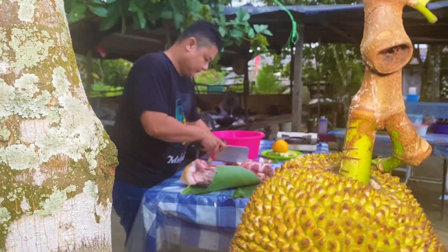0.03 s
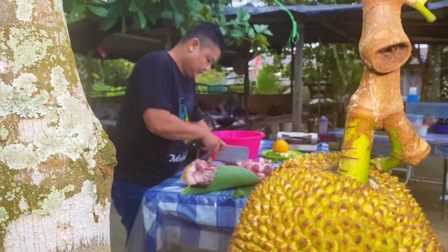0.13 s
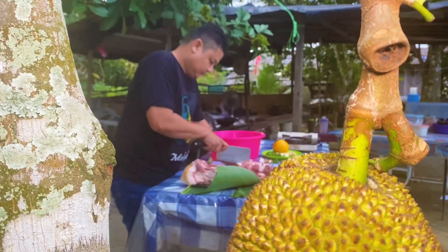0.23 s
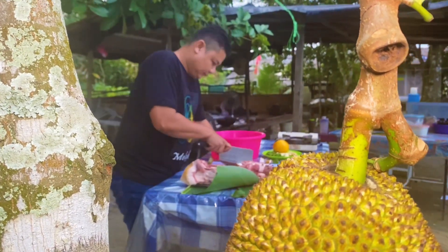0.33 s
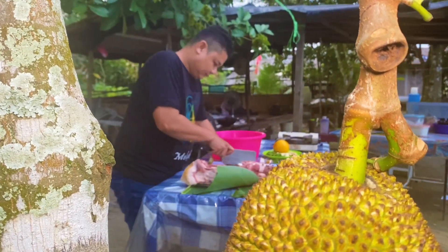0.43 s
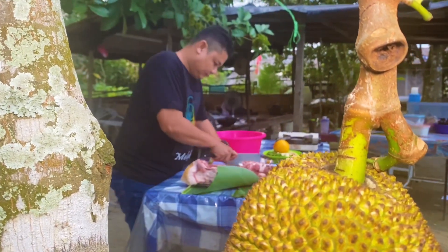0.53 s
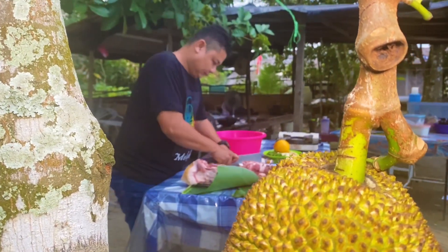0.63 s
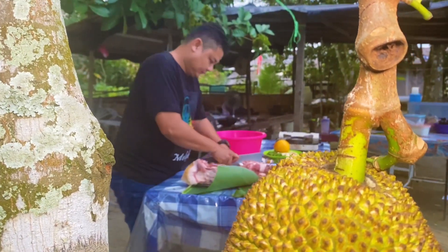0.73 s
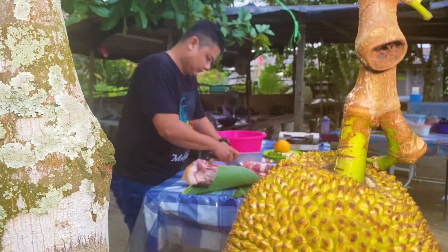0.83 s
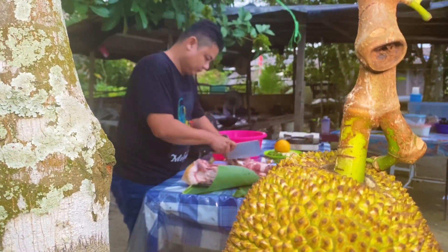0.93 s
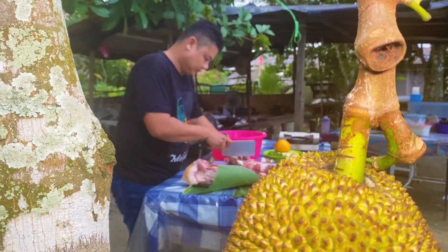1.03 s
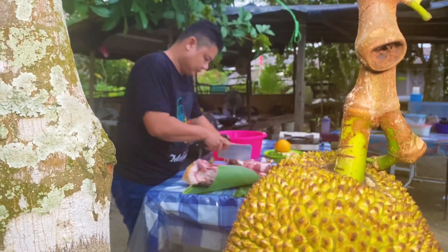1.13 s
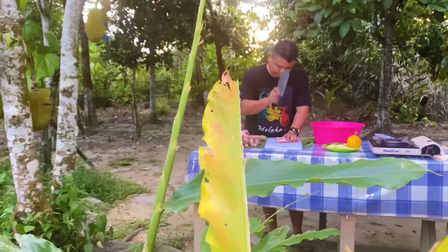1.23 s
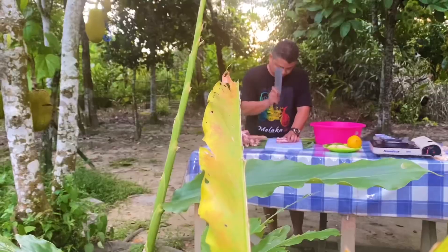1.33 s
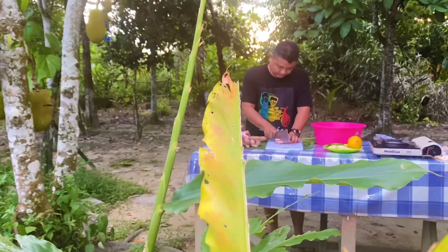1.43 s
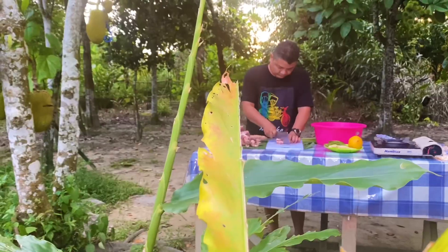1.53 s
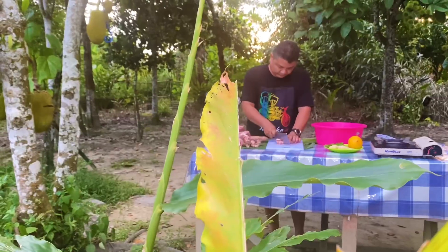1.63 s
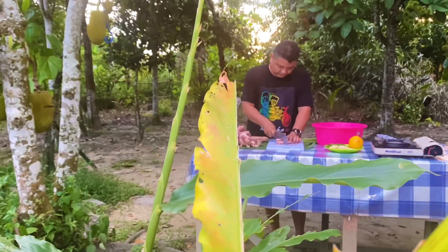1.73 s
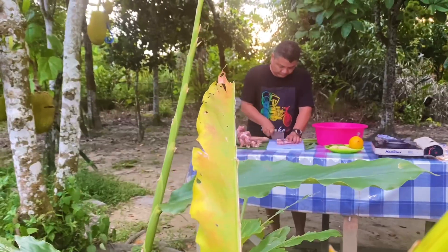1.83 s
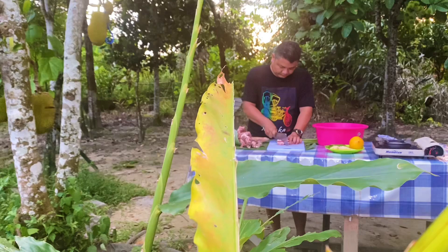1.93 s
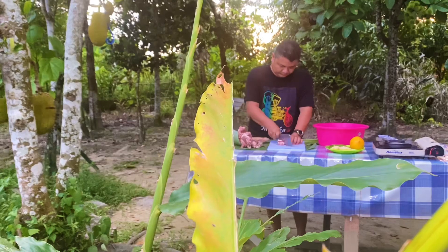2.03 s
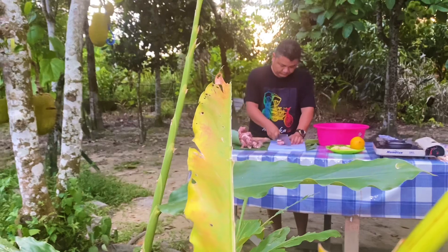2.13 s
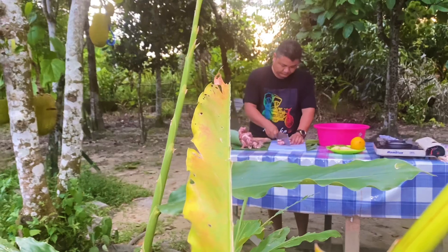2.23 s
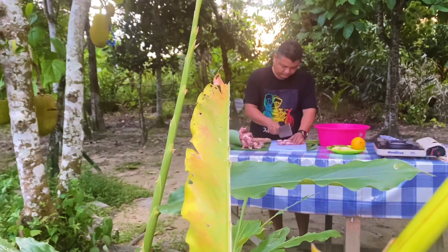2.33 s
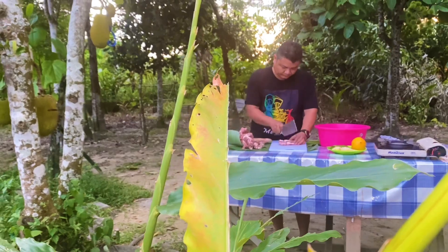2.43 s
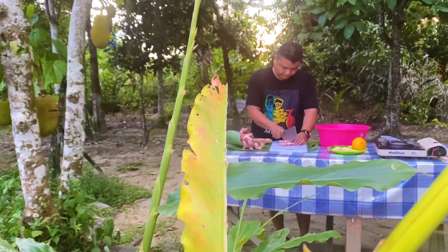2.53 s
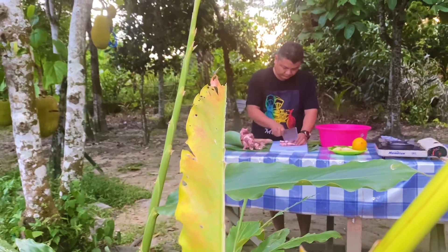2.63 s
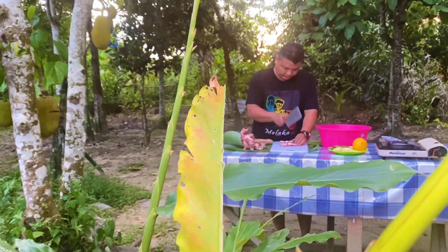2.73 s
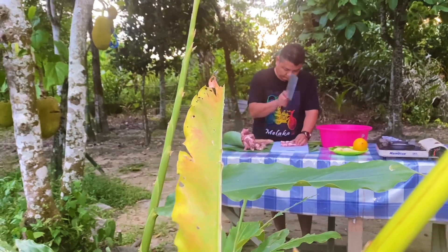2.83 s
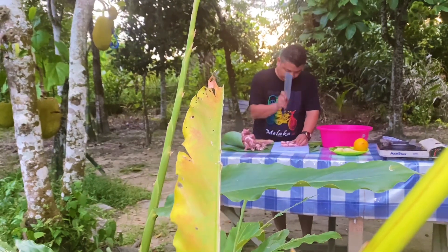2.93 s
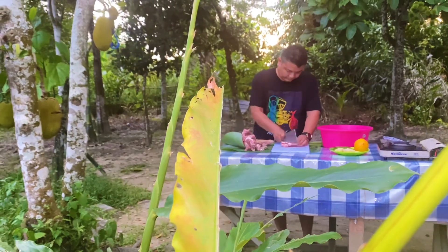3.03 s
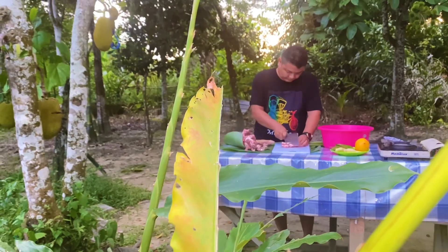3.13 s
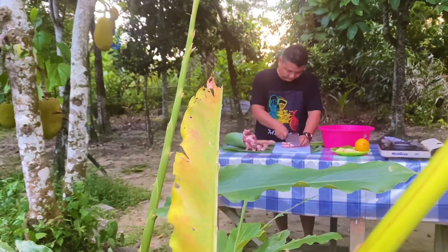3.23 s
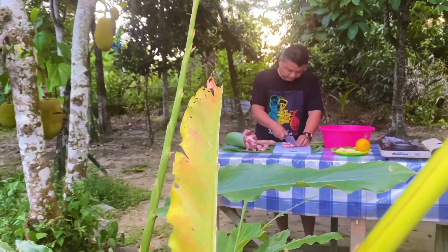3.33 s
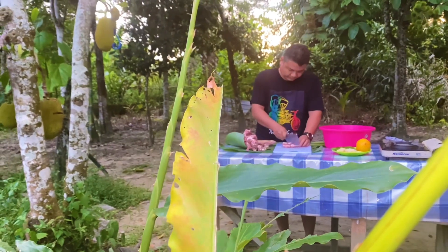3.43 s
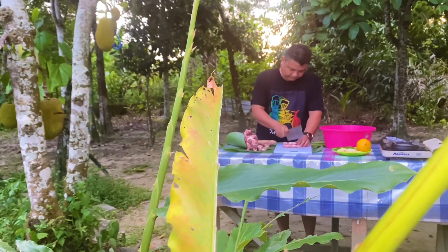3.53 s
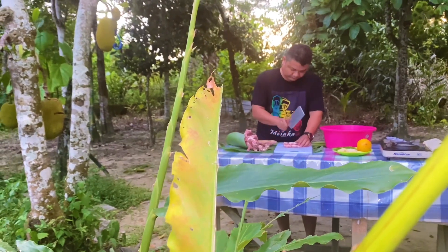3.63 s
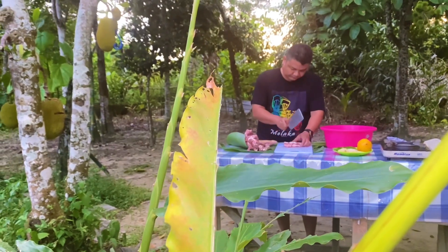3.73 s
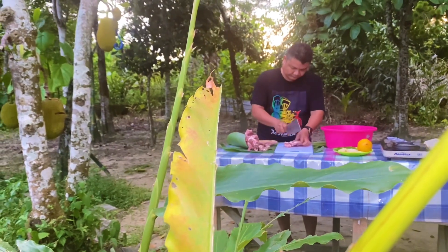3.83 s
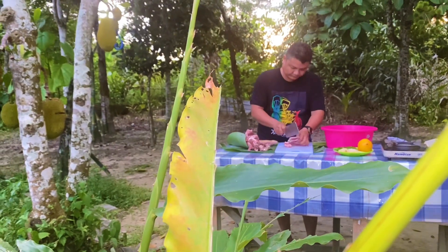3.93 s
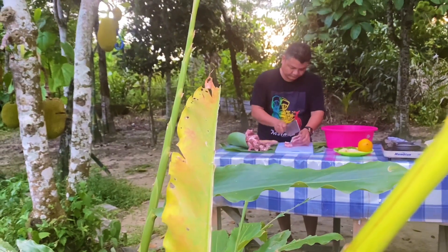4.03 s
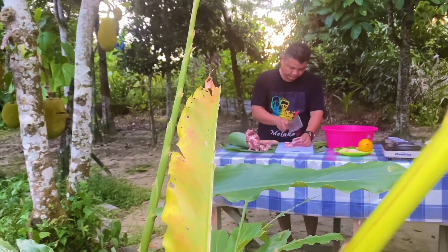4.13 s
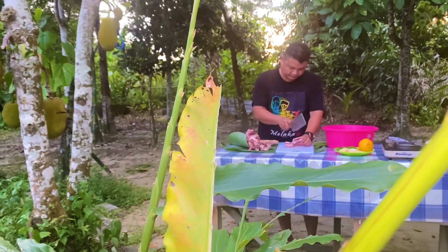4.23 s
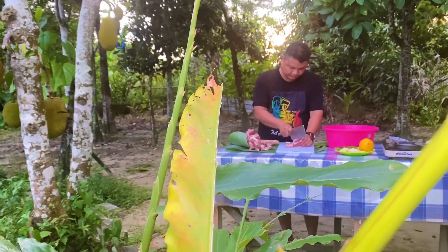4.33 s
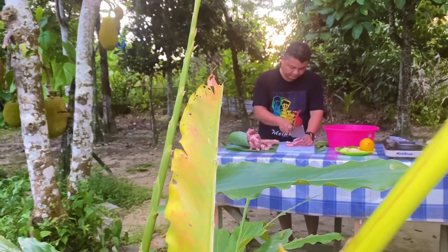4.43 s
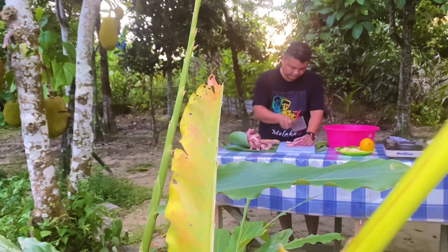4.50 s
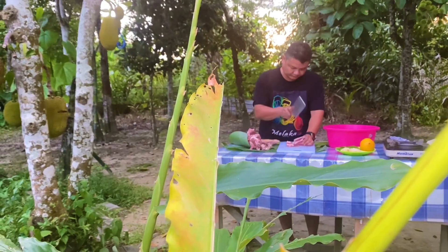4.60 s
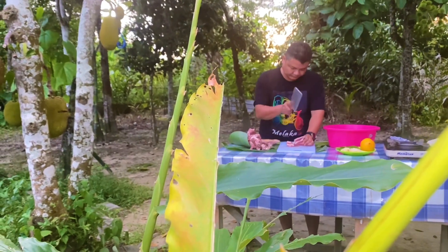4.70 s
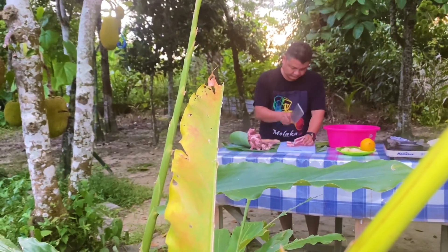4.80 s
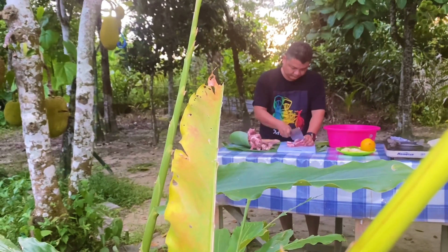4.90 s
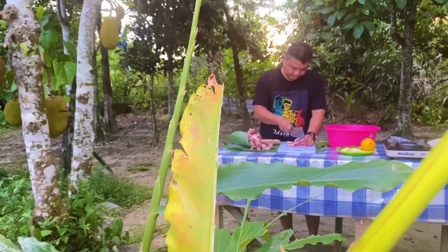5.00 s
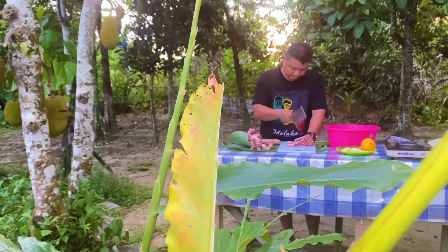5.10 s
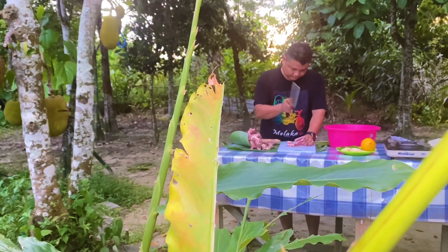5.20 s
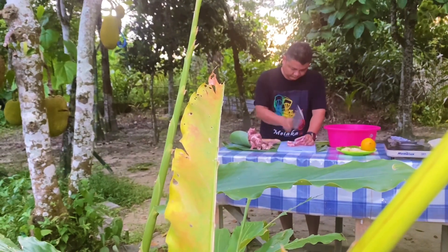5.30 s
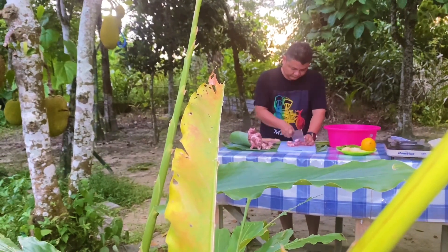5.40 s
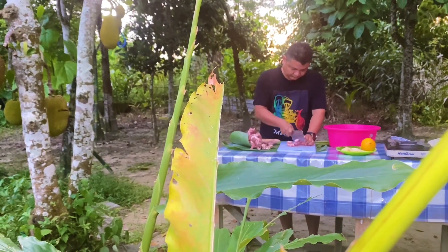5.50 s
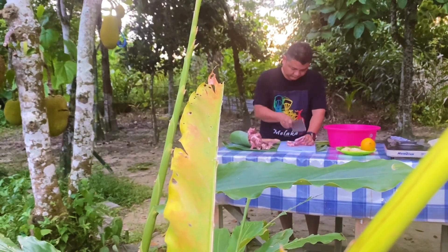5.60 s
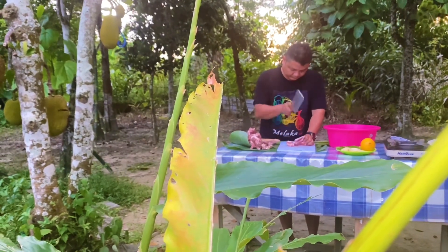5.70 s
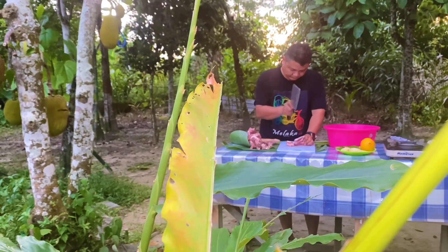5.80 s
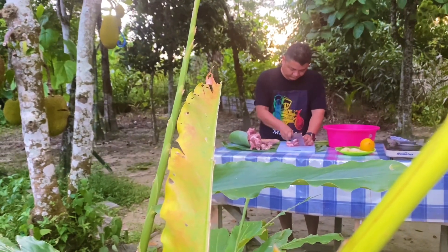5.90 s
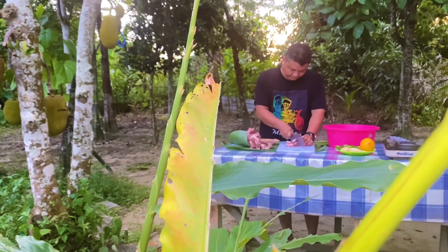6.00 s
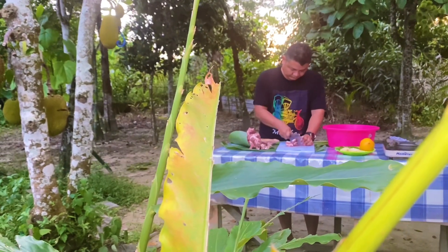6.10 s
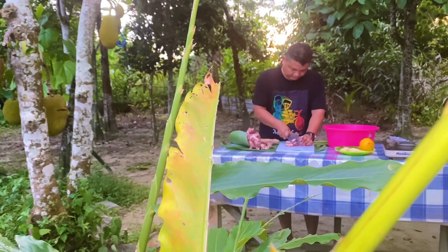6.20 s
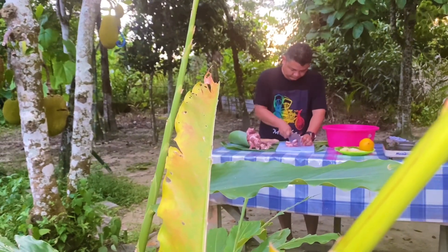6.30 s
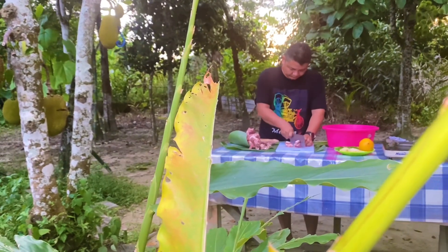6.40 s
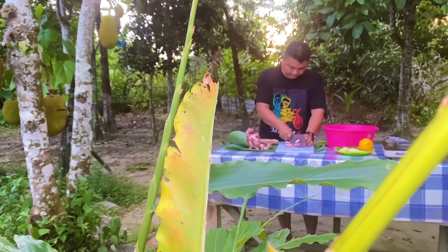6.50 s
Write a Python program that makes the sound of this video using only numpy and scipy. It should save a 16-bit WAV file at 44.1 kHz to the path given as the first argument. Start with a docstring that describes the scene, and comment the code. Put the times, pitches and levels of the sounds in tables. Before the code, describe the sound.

In a garden, heard from a few metres away, a cleaver chops meat and bone on a wooden board. Two hard, crunching chops come well apart, then a faint one and two moderate ones closer together, with light blade taps between. The stronger blows knock the board and rattle loose dishes on the table. Distant motors hum low while insects sing and birds call faintly. Everything briefly drops out just before the first chop.

```python
"""A garden, a few metres from a table where a cleaver chops meat and bone on a wooden board.
Each chop crunches, knocks the board and makes it hop; a tenth of a second later loose ware rattles down.
Behind it two far motors hum, insects sing, birds call and leaves hiss.
The level dips briefly to near silence just after the first second."""
import sys
import numpy as np
from scipy import signal
from scipy.fft import rfft, irfft, next_fast_len
from scipy.io import wavfile
from scipy.ndimage import uniform_filter1d

SR = 44100
rng = np.random.default_rng(int(sys.argv[2]) if len(sys.argv) > 2 else 0)


def master_out(mix):
    """Clip the mix to full scale and print it as 16-bit PCM to the path in sys.argv[1]."""
    frames = np.transpose(np.atleast_2d(mix))
    ceiling = np.clip(frames, -1, 1)
    pcm = np.round(ceiling * 32767).astype(np.int16)
    wavfile.write(sys.argv[1], SR, pcm)


N = 288936
T = np.arange(N) / SR
FFT_SIZE = next_fast_len(N, True)

# start_s, sink_s, snap_fraction, crunch_db, blade_db, snap_db, seat_db, thud_db, thud_hz, hop_s,
# landing_db, rebound_db, tilt_db_per_octave, landing_tilt_db_per_octave, edge_db
CHOPS = [(1.4566, 0.0074, 0.42, -10, -32, -2, 0, -1, 225, .0178, -6.5, -7, 1.3, 1.3, -23),
         (3.05, 0.012, 0.41, -9.5, -35, 0, -3, -1, 163, 0.013, -5.5, -5, 1.5, 3, -26),
         (4.913, 0.008, 0.31, -29, -62.5, -16, -30, -14, 233, 0.013, -31, -19, .8, 1.5, -42),
         (5.371, .0115, .23, -21, -30, -22, -21, -9, 138.6, .0175, -14.5, -8, -1, -1.7, -21),
         (5.9203, .0125, .62, -16.5, -23, -13, -15.5, -8, 211, 0.015, -20, -13, -1, -1, -24)]
# freq_hz, density_db
CRUNCH_SPECTRUM = [(150, -11.5), (500, 14), (1800, -3), (3000, -4), (5000, -7), (6500, -13), (8500, -5.5),
                   (10500, -3.5), (12000, -11), (13500, -10), (15000, -22)]
# pitch_hz, level_db, t60_s
BLADE_MODES = [(3370, -9, 0.05), (4190, -20.5, 0.0434), (4920, 0, 0.065), (4850, 11.5, 0.015),
               (6200, -21, 0.0405)]
def cleaver(growth_db=4, sizzle_db=-10, attack_s=.0013, bite_s=.0013):
    """The edge bites, bone splinters in tiny cracks as the blade sinks, the blade rings and sizzles."""
    out, t = np.zeros(N), T[:SR // 4]
    for s, sink_s, snap_fraction, crunch_db, blade_db, *_, edge_db in CHOPS:
        depth = np.minimum(t / sink_s, 1)
        sinking = undb(growth_db * (depth - 1)) * decay(np.maximum(t - sink_s, 0), .017)
        cracks = np.exp(.86 * rng.standard_normal(len(t)))
        splinters = unit(np.repeat(cracks, 16)[:len(t)])
        sizzle = undb(sizzle_db) * depth * decay(t, .29)
        force = (sinking * splinters + sizzle) * np.minimum(t / attack_s + .072, 1)
        add(out, s, undb(crunch_db) * colour(rng.standard_normal(len(t)) * force, CRUNCH_SPECTRUM))
        add(out, s + bite_s, undb(edge_db) * steel(t60_s=.056))
        blade = ring(BLADE_MODES, t, detune=.0025, scatter_db=5.5)
        add(out, s + snap_fraction * sink_s, undb(blade_db) * blade)
    return out


# freq_hz, density_db
STEEL_SPECTRUM = [(500, -22), (3000, -14), (5000, -9.5), (7500, -8), (9200, 2), (10500, 2.5), (12200, -7),
                  (13800, -3), (16000, -9)]
def steel(t60_s):
    """Steel meets something hard: a short, bright snap."""
    return burst(STEEL_SPECTRUM, T[:SR // 12], t60_s)


# pitch_hz, level_db, t60_s
DEEP_BOARD_MODES = [(340, -6, .06), (410, 0, .06), (545, -1, .05), (790, -2, .05)]
def board(second_edge_s=.006, rebound_s=.01035):
    """Bone snaps, the blade seats, the board hops and lands edge by edge, the table springs back."""
    out = np.zeros(N)
    for (s, sink_s, snap_fraction, _, _, snap_db, seat_db, thud_db, thud_hz, hop_s,
         landing_db, rebound_db, tilt, landing_tilt, _) in CHOPS:
        seat_s = s + sink_s
        landing_s = seat_s + hop_s
        add(out, s + snap_fraction * sink_s, knock(snap_db, snap_db - 7, tilt))
        add(out, seat_s, knock(seat_db - 4.5, seat_db, tilt) + undb(thud_db) * thud(thud_hz))
        # only a heavy blow drives the deep modes
        for hit_s, db in ((seat_s, -4), (landing_s, -10)):
            punch = ring(DEEP_BOARD_MODES, T[:SR // 7], detune=.01, scatter_db=1)
            add(out, hit_s, undb(db + 2 * thud_db) * punch)
        for lag_s, db in ((0, landing_db), (second_edge_s, landing_db - 1.5)):
            add(out, landing_s + lag_s, knock(db - 4, db, landing_tilt))
        table_top = thud(hz=105, t60_s=.025)
        frame = undb(-8.5) * thud(hz=64, t60_s=.058)
        add(out, landing_s + rebound_s, undb(rebound_db) * (table_top + frame))
    return out


# pitch_hz, level_db, t60_s
BOARD_MODES = [(330, -6.5, .08), (412.4, -2, 0.12), (467, 0.5, 0.073), (578, 5, 0.082), (666, 2.5, 0.059),
               (735, 3, 0.08), (833, 2.5, 0.085), (946, -2, 0.067), (1010, -7.5, 0.117), (1060, -8.5, 0.11),
               (1190, -10.5, .09), (1310, -6.5, 0.071), (1448, -4, 0.063), (1645, -7.5, 0.1),
               (1918, -9, 0.09), (2073, -10, 0.058), (2202, -10.5, 0.11), (2600, -32, 0.06)]
# freq_hz, density_db
CLATTER_SPECTRUM = [(100, -42), (300, 7.5), (800, 6.2), (1500, 3), (2200, -1), (3200, -10.5), (5000, -14.5),
                    (10000, -23), (15000, -33)]
def knock(ring_db, clatter_db, tilt_db_per_octave=0, pivot_hz=700, tilt_top_hz=2190):
    """The board rings and clatters; harder contact tilts both towards the treble."""
    def tilt_db(hz):
        return tilt_db_per_octave * np.log2(min(hz, tilt_top_hz) / pivot_hz)
    t = T[:SR // 7]
    modes = [(hz, db + tilt_db(hz), t60_s) for hz, db, t60_s in BOARD_MODES]
    clatter = burst([(hz, db + tilt_db(hz)) for hz, db in CLATTER_SPECTRUM], t, t60_s=.055)
    return .37 * undb(ring_db) * ring(modes, t, detune=.0066, scatter_db=1) + undb(clatter_db) * clatter


def thud(hz, t60_s=.041, attack_s=.0017):
    """Part of the table swings for a few cycles."""
    t = T[:SR // 7]
    return 5.05 * np.sin(2 * np.pi * hz * t) * decay(t, t60_s) * (1 - np.exp(-(t / attack_s) ** 2))


# start_s, level_db
BLADE_TAPS = [(.506, -44.5), (.623, -43), (1.947, -38.5), (2.533, -36), (2.559, -39.5), (3.822, -35),
              (4.367, -32), (4.479, -46)]
def taps(attack_s=.0056):
    """The blade touches the board lightly; meat cushions the onset."""
    out = np.zeros(N)
    for s, db in BLADE_TAPS:
        tap = knock(db, db + 5) + undb(db - 11) * thud(hz=207)
        add(out, s, tap * np.minimum(T[:len(tap)] / attack_s, 1))
    return out


# start_s, body_db, tick_db, steel_db
WARE_DROPS = [(1.5769, -16.5, -27, -37), (1.587, -21, -26, -34), (1.6128, -19.5, -22, -16),
              (1.6205, -16.5, -29, -40), (1.626, -21.5, -25, -40), (3.163, -19, -24, -38),
              (3.174, -38, -34, -19.5), (3.1821, -20.5, -28, -36), (3.195, -26, -35, -55),
              (3.2054, -22.5, -43, -55), (3.2215, -26, -40, -55), (3.236, -24, -39, -50),
              (5.4755, -22.5, -37, -52), (5.4808, -17.5, -32, -38), (5.49, -28, -42, -50),
              (5.5124, -29, -46, -60), (6.028, -19.5, -31, -28), (6.035, -25, -40, -55),
              (6.047, -25, -48, -63), (6.071, -29, -44, -58), (6.09, -27, -47, -58)]
# start_s, level_db
SETTLING_KNOCKS = [(1.543, -33), (1.565, -30), (1.581, -30), (3.156, -32), (3.203, -27.5), (5.449, -33),
                   (5.463, -35), (5.987, -41), (6.003, -38), (6.017, -34), (6.078, -37)]
def rattles(bounce_s=.0063):
    """Ware thrown up by a chop drops and bounces once; board and table knock as they settle."""
    out = np.zeros(N)
    for s, body_db, tick_db, steel_db in WARE_DROPS:
        add(out, s, clink(body_db, tick_db) + undb(steel_db) * steel(t60_s=.011))
        flight_s = bounce_s * (1 + .408 * rng.uniform(-.997, 1))
        add(out, s + flight_s, clink(body_db - 9.5, tick_db - 12))
    for s, db in SETTLING_KNOCKS:
        add(out, s, knock(db, db - .5, tilt_db_per_octave=.3))
    return out


# pitch_hz, level_db, t60_s
WARE_MODES = [(1053, -10, 0.082), (1415, -5.5, 0.024), (1620, -2.5, .025), (1960, 2.5, 0.024),
              (2216, 3, 0.014), (2400, -11, 0.013), (2920, -11, 0.0095), (3330, -14, 0.021)]
# freq_hz, density_db
CLACK_SPECTRUM = [(300, -11), (900, -3), (1400, -6), (2000, 1.5), (2600, -6), (3300, -5.5), (4200, -20.5),
                  (8000, -23.5), (15000, -33)]
# freq_hz, density_db
TICK_SPECTRUM = [(400, 3), (2000, 0), (4000, 2.5), (7000, 1), (10500, 6.5), (14000, -6), (16000, -16)]
def clink(body_db, tick_db):
    """Ware hits the table: a tick, a broad clack and a short ring, detuned anew each hit."""
    t = T[:SR // 12]
    tick = burst(TICK_SPECTRUM, t, t60_s=.021)
    clack = burst(CLACK_SPECTRUM, t, t60_s=.035)
    body = undb(-7.5) * ring(WARE_MODES, t, detune=.045, scatter_db=3.5) + undb(-3) * clack
    return undb(body_db) * body + undb(tick_db) * tick


def chatter(count=7, delay_s=.079, length_s=.099, scatter_db=9, threshold_db=-14):
    """Things on the table chatter faintly after a hard chop."""
    out = np.zeros(N)
    for s, _, _, _, _, _, _, thud_db, *_ in CHOPS:
        for k, (jitter, softness) in enumerate(rng.random((count, 2))):
            db = -33 - .6 * thud_db - scatter_db * softness
            hit = clink(db, db - 13)
            if thud_db > threshold_db:
                add(out, s + delay_s + length_s * (k + jitter) / count, hit)
    return out


# time_s, firing_hz
ENGINE_SPEED = [(0, 99.66), (1, 101.2), (1.42, 109.1), (1.69, 94.8), (1.79, 123.6), (2.02, 120.8),
                (2.18, 96), (2.39, 92), (2.52, 125.2), (2.74, 99.9), (2.88, 125.2), (3.03, 122.6),
                (3.28, 103.2), (3.38, 124), (3.8, 133), (4.35, 127), (4.47, 109), (4.72, 104), (4.9, 120.1),
                (5.5, 108), (6.55, 116)]
# through the trees: time_s, level_db
ENGINE_LEVEL = [(0, -48.5), (.8, -51), (1.4, -35.5), (1.68, -38), (1.8, -32.5), (2.0, -37), (2.12, -27),
                (2.33, -36), (2.45, -32.5), (3.03, -28.5), (3.3, -35), (3.8, -32), (4.05, -36.5),
                (4.27, -30), (4.55, -36.5), (4.72, -36), (4.9, -28), (5.1, -45), (6.55, -42.5)]
def engine(cruise_hz=110.3, exhaust_hz=102.5, exhaust_half_width_hz=37, pace_s=.91):
    """A far engine: three harmonics arrive, the exhaust resonates, speed and throttle lift overtones."""
    hz, db = curves(ENGINE_SPEED)[0], curves(ENGINE_LEVEL)[0]
    recent_hz = uniform_filter1d(hz, int(pace_s * SR))
    throttle = undb(.3858 * (hz - recent_hz))
    overtone_db = -3 + .1178 * (hz - cruise_hz)
    exhaust_db = 9 / (1 + ((hz - exhaust_hz) / exhaust_half_width_hz) ** 2)
    phase = 2 * np.pi * np.cumsum(hz * (1 + .016 * walk(45))) / SR
    firing = np.sqrt(2) * np.sin(phase) * (1 + .49 * walk(35)) + undb(-3) * band(87, 51)
    second, third = (np.sqrt(2) * (1 + .49 * walk(50)) * np.sin(k * phase) for k in (2, 3))
    # uneven firings fill the gaps between harmonics
    rumble = undb(-4.5) * (2.73 * band(153, 60) + 1.16 * band(247, 66))
    rasp = undb(-18) * third + undb(-16) * band(401.7, 79)
    overtones = undb(overtone_db) * throttle * (undb(-1) * second + rumble + throttle * rasp)
    return undb(db) * (undb(exhaust_db) * firing + overtones)


# time_s, pitch_hz, level_db
MOTOR_DRONE = [(0, 100.1, -44), (1.05, 101.3, -51), (1.7, 102.6, -30.5), (2.45, 100.3, -29),
               (2.7, 101.7, -34), (3.35, 103, -36), (3.52, 117, -22), (3.7, 112, -37), (4.05, 117.3, -33),
               (4.27, 116, -23), (4.45, 112.3, -28.5), (4.72, 111.3, -33.5), (4.88, 119, -25.5),
               (5.1, 112.1, -46.5), (6.55, 116.3, -46.5)]
def motor(roughness=.33, waver=.0068):
    """A second far motor holds a low, nearly pure note."""
    hz, db = curves(MOTOR_DRONE)
    hum = np.sqrt(2) * tone(hz * (1 + waver * walk(20)))
    return undb(db) * hum * (1 + roughness * walk(24))


# start_s, length_s, start_hz, middle_hz, end_hz, level_db, hoarseness
WHISTLES = [(0, 0.16, 5110, 5170, 5190, -60.5, 0.84), (.565, .03, 3320, 3000, 2750, -61, .2),
            (.738, 0.032, 3200, 2730, 2350, -61, .2), (1.003, .09, 5100, 5100, 5050, -56.5, 0.83),
            (1.035, .055, 2040, 2120, 2060, -55, .5), (1.701, 0.1, 5250, 5220, 5060, -51, 1.2),
            (2.675, .065, 3150, 3060, 3030, -60, .1), (3.858, 0.061, 4600, 5560, 5670, -50, .3),
            (3.906, 0.27, 1665, 1680, 1638, -47, 0.85), (3.94, 0.047, 3900, 3630, 3000, -55, 1.2),
            (4.35, 0.16, 2450, 2260, 2120, -46.5, 0.9), (4.512, 0.034, 4620, 3700, 3170, -56, .3),
            (5.785, .17, 1630, 1610, 1600, -46, 1.1), (5.96, .15, 1650, 1680, 1660, -42.5, 1.1),
            (5.806, 0.068, 5350, 4000, 3250, -50, .15), (5.87, .02, 5600, 5150, 4850, -57, .2),
            (5.9, .018, 5600, 5200, 4860, -53, .2), (6.119, 0.13, 1780, 1737, 1660, -51, 0.8),
            (6.241, 0.27, 1416, 1400, 1367, -51.5, 0.8)]
def whistles():
    """Far birds whistle; fast flutter in pitch and level makes them hoarse."""
    out = np.zeros(N)
    quaver = .055 * walk(800) + .012 * walk(70)
    flutter_db = 2 * walk(80)
    for s, length_s, *pitches_hz, db, hoarseness in WHISTLES:
        hz, swell = note(length_s, *pitches_hz)
        span = int(s * SR) + np.arange(len(hz))
        whistle = tone(hz * (1 + hoarseness * quaver[span]))
        add(out, s, undb(db + hoarseness * flutter_db[span]) * swell * whistle)
    return out


# start_s, length_s, start_hz, middle_hz, end_hz, level_db
NASAL_CALLS = [(.033, 0.048, 429, 455, 452, -53), (.395, .085, 531, 505, 492, -55),
               (.88, .055, 400, 392, 382, -58), (2.115, 0.16, 338, 388, 355, -47)]
# freq_hz, gain_db
THROAT_RESPONSE = [(900, -29), (1400, -4), (1900, 1), (2350, -13.5), (2900, -25), (3500, -6), (3900, -7),
                   (4500, -30)]
def nasal_calls():
    """A bird's nasal cries: harmonics 3 to 11, shaped by its throat."""
    out = np.zeros(N)
    waver = .0058 * walk(200)
    for s, length_s, *pitches_hz, db in NASAL_CALLS:
        hz, swell = note(length_s, *pitches_hz)
        hz = hz * (1 + waver[int(s * SR):][:len(hz)])
        cry = sum(undb(np.interp(k * hz, *np.transpose(THROAT_RESPONSE))) * tone(k * hz)
                  for k in range(3, 12))
        add(out, s, undb(db) * swell * cry)
    return out


# start_s
PEEP_TIMES = [2.295, 2.452, 2.59, 2.705, 2.897, 3.375, 3.525, 3.74, 4.245, 4.64, 4.745, 5.105, 5.29, 5.668,
              5.845, 6.228]
def peeps(pitch_hz=2200, length_s=.031):
    """A small creature peeps repeatedly on nearly one note."""
    out = np.zeros(N)
    hz, swell = note(length_s, pitch_hz, pitch_hz, pitch_hz)
    for s in PEEP_TIMES:
        detune, strength = rng.standard_normal(2)
        add(out, s, undb(-56.5 + 1.1 * strength) * swell * tone(hz * (1 + .009 * detune)))
    return out


# start_s, level_db
INSECT_RASPS = [(1.501, -53), (2.5, -52), (4.01, -51), (4.94, -50.5), (5.97, -51)]
def insect(length_s=.49, release_s=.012, pulse_hz=99):
    """One nearer insect rasps in rapid pulses that swell, then stop."""
    corners_s = [0, length_s / 2, length_s - release_s, length_s]
    swell = sum(undb(db) * np.interp(T - s, corners_s, [.038, 1, 1, .059]) for s, db in INSECT_RASPS)
    cycle = np.cumsum(pulse_hz * (1 + .006 * walk(8))) / SR % 1
    pulses = unit(np.sin(np.pi * cycle) * np.exp(-2.5 * cycle))
    return swell * pulses * band(hz=9330, width_hz=450)


# centre_hz, width_hz, start_db, end_db
SONG_AND_HISS_BANDS = [(4690, 320, -59, -52.5), (5060, 400, -63.5, -61.5), (6860, 630, -58.5, -58),
                       (7865, 710, -61, -55)]
def song_and_hiss():
    """Steady narrow bands of insect song, plus a band of background hiss near 8 kHz."""
    out = np.zeros((2, N))
    for hz, width_hz, start_db, end_db in SONG_AND_HISS_BANDS:
        pair = np.array([band(hz, width_hz), band(hz, width_hz)])
        db = start_db + (end_db - start_db) * T / T[-1]
        out += pair * undb(db + .302 * walk(4.7) + .29 * walk(40))
    return out


# freq_hz, density_db
AIR_SPECTRUM = [(25, -21.5), (45, -7), (65, -5), (100, 0), (170, -4), (240, -4), (330, -22), (550, -26),
                (800, -22.5), (1200, -29), (2000, -30), (3400, -37), (6000, -38.5), (8000, -54),
                (9500, -30.5), (12000, -49.5), (15000, -41.5)]
# time_s, level_db
AIR_LEVEL = [(0, -39), (1, -40.5), (1.4, -33), (3, -33), (4.5, -34.5), (5.5, -35.5), (6.55, -32)]
def air():
    """Distant rumble and the faint hiss of leaves."""
    return unit(diffuse(AIR_SPECTRUM, FFT_SIZE)[:, :N]) * undb(curves(AIR_LEVEL)[0] + walk(10))


# freq_hz, density_db
ECHO_SPECTRUM = [(60, 4), (200, -1), (600, -5.5), (1500, 2.5), (3000, 4.5), (8000, 4), (15000, -25.5)]
def echoes(x, t60_s, onset_s):
    """Scatter from ground, trunks and leaves, by different paths to each side."""
    t = T[:SR // 2]
    tails = diffuse(ECHO_SPECTRUM, len(t)) * decay(t, t60_s) * (1 - np.exp(-(t / onset_s) ** 2))
    tails /= np.linalg.norm(tails, axis=1, keepdims=True)
    return signal.oaconvolve(x[None], tails, axes=1)[:, :N]


# freq_hz, side_over_mid_db
DIFFUSE_WIDTH = [(30, -18), (110, -13.5), (300, -3), (700, 3.5), (1400, 0), (15000, -2)]
def diffuse(spectrum, size):
    """Noise from all round: left and right alike in the bass, apart in the treble."""
    mid, side = rfft(rng.standard_normal((2, size)))
    width = gains(DIFFUSE_WIDTH, size)
    pair = np.array([mid + width * side, mid - width * side]) / np.sqrt(1 + width ** 2)
    return irfft(pair * gains(spectrum, size), size)


# freq_hz, left_lead_rad
PORT_PHASE = [(0, 0), (100, -.3), (300, -.3), (700, -.4), (1400, -.7), (2400, 0), (3200, .5), (6400, .2),
              (7600, -1.6), (8550, -3.14), (10000, -6.28), (12200, -9.42), (14200, -12.57), (16000, -16)]
def from_front(x, left_over_right):
    """Frontal sound reaches two microphone ports with a phase gap that winds up in the treble."""
    phase = np.interp(np.fft.rfftfreq(FFT_SIZE, 1 / SR), *np.transpose(PORT_PHASE))
    sign = np.array([[1], [-1]])
    response = np.exp(.5j * sign * phase) * left_over_right ** (sign / 2)
    return irfft(rfft(x, FFT_SIZE) * response, FFT_SIZE)[:, :N]


def ring(modes, t, detune, scatter_db):
    """Struck modes; each blow lands elsewhere and weights them anew."""
    chance = rng.standard_normal((len(modes), 2))
    out = np.zeros(len(t))
    for k, ((hz, db, t60_s), (strength, shift)) in enumerate(zip(modes, chance)):
        swing = np.sin(2 * np.pi * hz * (1 + detune * shift) * t)
        out += (-1) ** k * undb(db + scatter_db * strength) * decay(t, t60_s) * swing
    return out


def burst(spectrum, t, t60_s):
    """Decaying coloured noise."""
    return colour(rng.standard_normal(len(t)) * decay(t, t60_s), spectrum)


def note(length_s, *pitches_hz):
    """A call's pitch curve through start, middle and end, and its rounded swell."""
    progress = np.linspace(0, 1, int(length_s * SR))
    hz = np.polyval(np.polyfit([0, .5, 1], pitches_hz, 2), progress)
    return hz, np.sqrt(np.abs(np.sin(np.pi * progress)))


def tone(hz):
    """Sine following a pitch curve."""
    return np.sin(2 * np.pi * np.cumsum(hz) / SR)


def band(hz, width_hz):
    """Noise in one steep resonance, rms 1."""
    peak = signal.iirpeak(hz, hz / width_hz, fs=SR)
    return unit(signal.lfilter(*peak, signal.lfilter(*peak, rng.standard_normal(N))))


def walk(rate_hz):
    """Smooth random drift, rms 1."""
    hold = int(SR / rate_hz)
    steps = np.repeat(rng.standard_normal(N // hold + 1), hold)
    return unit(uniform_filter1d(uniform_filter1d(steps, hold), hold)[:N])


def colour(x, spectrum, size=1024):
    """Minimum-phase filter of unit energy."""
    cepstrum = irfft(np.log(gains(spectrum, size)))
    cepstrum[1:size // 2] *= 2
    cepstrum[size // 2 + 1:] = 0
    response = irfft(np.exp(rfft(cepstrum)))
    return signal.fftconvolve(x, response / np.linalg.norm(response))[:len(x)]


def highpass(x, hz):
    """Third-order bass cut."""
    return signal.sosfilt(signal.butter(3, hz, "highpass", fs=SR, output="sos"), x)


def gains(spectrum, size):
    """A spectrum's gain per FFT bin."""
    hz, db = np.transpose(spectrum)
    return undb(np.interp(np.log(np.fft.rfftfreq(size, 1 / SR) + 1), np.log(hz), db))


def curves(rows):
    """Columns of a timed table, interpolated per sample."""
    s, *columns = np.transpose(rows)
    return [np.interp(T, s, column) for column in columns]


def decay(t, t60_s):
    """Falls 60 dB in t60_s."""
    return np.exp(-np.log(1000) * t / t60_s)


def add(track, start_s, sound):
    """Mix a sound in at start_s."""
    i = int(start_s * SR)
    track[i:i + len(sound)] += sound[:N - i]


def undb(db):
    """Decibels to gain."""
    return 10 ** (np.asarray(db) / 20)


def unit(x):
    """Scale to rms 1."""
    return x / np.sqrt(np.mean(x ** 2))


# freq_hz, left_over_right_db
TABLE_PAN = [(60, -0.5), (250, -1), (600, -2), (1100, -3), (2000, -0.5), (4000, 5.5), (12000, -1)]
# time_s, gain_db
MIX_GAIN = [(1.03, -8), (1.11, -15), (1.125, -74), (1.22, -68), (1.24, -29), (1.32, -14.5)]
def scene():
    """The table a little to the right, its echoes and the garden; the level dips once."""
    table = cleaver()
    table += highpass(board() + taps(), hz=49)  # a table radiates little deep bass
    table += rattles() + chatter()
    ground = undb(-9) * highpass(echoes(table, t60_s=.024, onset_s=.0003), hz=449)
    near_trees = undb(-14.5) * echoes(table, t60_s=.35, onset_s=.012)
    far_trees = undb(-27.5) * echoes(table, t60_s=.38, onset_s=.31)
    garden = from_front(engine() + motor() + insect(), undb(-.5)) + air() + song_and_hiss()
    calls = whistles() + nasal_calls() + peeps()
    garden += calls + undb(-2) * echoes(calls, t60_s=.4, onset_s=.0081)
    direct = from_front(table, gains(TABLE_PAN, FFT_SIZE))
    return (direct + ground + near_trees + far_trees + garden) * undb(curves(MIX_GAIN)[0])


TOP_HZ = 15300
def record(dry):
    """Soft clip, then a steep low-pass."""
    lowpass = signal.ellip(8, .2, 70, TOP_HZ, fs=SR, output="sos")
    return signal.sosfilt(lowpass, 1.547 * np.tanh(dry))


dry = scene()
out = record(dry)
master_out(out)
```